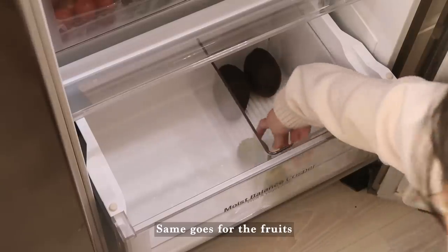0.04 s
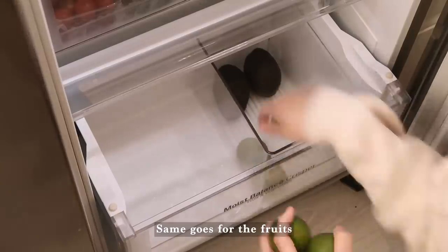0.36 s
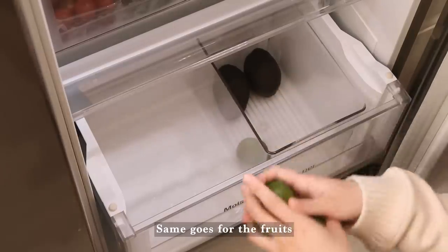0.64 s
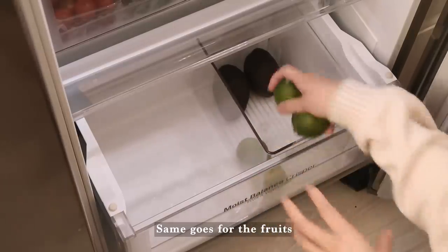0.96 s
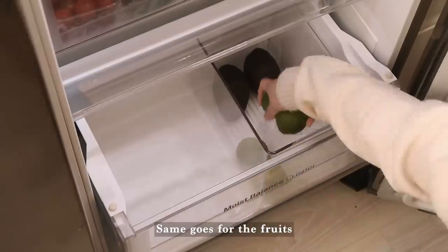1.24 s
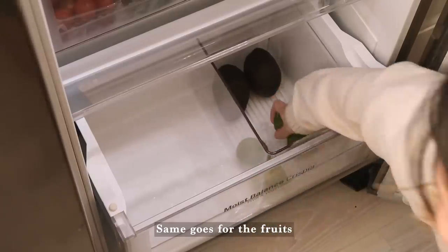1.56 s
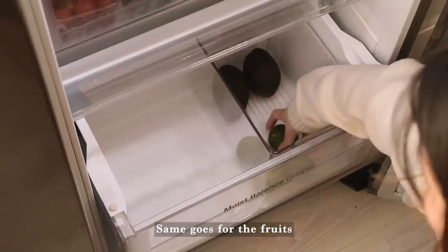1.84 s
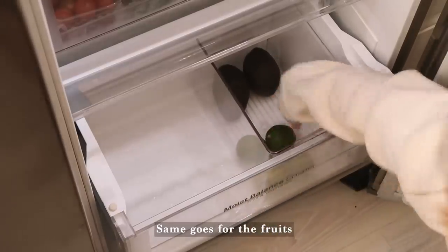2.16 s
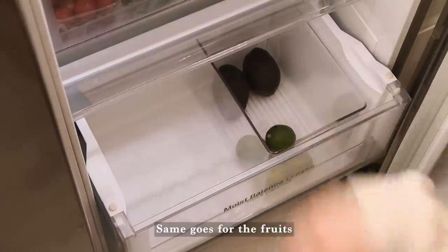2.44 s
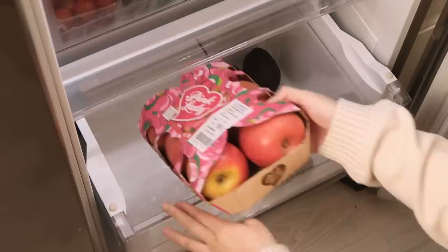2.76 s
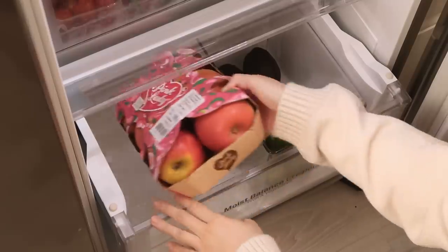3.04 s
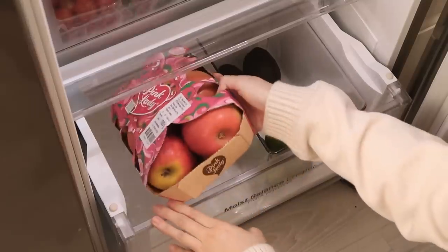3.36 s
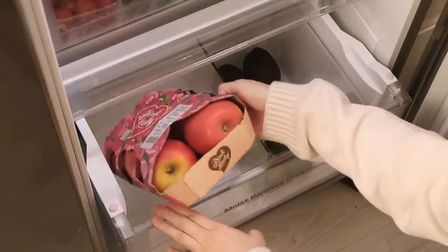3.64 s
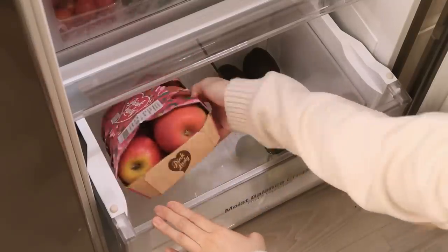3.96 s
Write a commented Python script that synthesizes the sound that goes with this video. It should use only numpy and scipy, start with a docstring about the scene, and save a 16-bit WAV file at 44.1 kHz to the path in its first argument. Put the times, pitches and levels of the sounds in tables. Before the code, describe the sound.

Dull thuds sound in a plastic fridge drawer as limes land and roll. A sleeve brushes past, then a carton of apples clatters in and scrapes lightly. The fridge hums low in a quiet kitchen.

```python
"""Limes, then a carton of apples, are set down in the plastic drawer of an open fridge.
Each blow rattles the thin walls, knocks the panel it lands on and makes the drawer's floor boom.
A sleeve brushes past; the carton scrapes along the plastic on its way in.
Behind, in a quiet kitchen: compressor hum, soft air and two spells of faint high ticks."""
import sys
import numpy as np
from scipy import signal
from scipy.fft import rfft, irfft
from scipy.io import wavfile
from scipy.ndimage import uniform_filter1d

SR = 44100
rng = np.random.default_rng(int(sys.argv[2]) if len(sys.argv) > 2 else 0)


def persist_wave(psi):
    """Save psi, clipped to +-1, as 16-bit WAV."""
    counts = np.round(np.clip(psi, -1, 1) * 32767).astype(np.int16)
    wavfile.write(sys.argv[1], SR, np.atleast_2d(counts).T)


N = 176400

# compressor and fan tones: freq_hz, rms_db
HUM_TONES = [(56.6, -40), (113.2, -53), (143.5, -61), (148, -64), (313, -59.5), (452.5, -67), (1825, -75),
             (13001, -90)]
# kitchen air: freq_hz, density_db
AIR_SPECTRUM = [(20, -8), (70, -1), (130, 0), (200, -3), (300, -3), (420, -6), (550, -9), (750, -13),
                (1100, -15.5), (2000, -16), (2600, -19), (4300, -23), (6000, -27.5), (9000, -33),
                (13500, -40), (15500, -54)]
# air width: freq_hz, side_to_mid_db
AIR_WIDTH = [(60, -46.5), (180, -8.5), (550, -2.5), (1650, -2.5), (4970, 0.5), (15000, 3)]
# spells of ticking: start_s, end_s
TICK_SPELLS = [(.1, 1.22), (3.66, 5.7)]
# room tail colour: freq_hz, gain_db
ROOM_SPECTRUM = [(60, -8), (150, -6.5), (300, -3), (600, -1.5), (3000, -4.5), (10000, -6)]
# room tail decay: freq_hz, t60_s
ROOM_DECAY = [(80, 0.92), (250, 0.37), (600, 0.29), (1500, 0.34), (4000, 0.29), (12000, 0.27)]
# foreground width: freq_hz, side_gain_db
SIDE_GAIN = [(100, -58), (300, -27.5), (1000, -21), (2200, -18.5), (4200, -8.5), (8000, 5.5)]
# sleeve as the arm reaches for the carton: time_s, level_db
SLEEVE_ENVELOPE = [(2.44, -68), (2.47, -54.5), (2.59, -52), (2.755, -54.5), (2.8, -67)]
# cloth friction: freq_hz, density_db
CLOTH_SPECTRUM = [(300, -16), (650, -1.5), (1200, -10), (2200, -5.5), (2700, -0.5), (3400, -8),
                  (6000, -18.5), (12000, -41)]
# carton slides: start_s, length_s, crest_db
CARTON_SLIDES = [(3.415, 0.19, -49.5), (3.759, 0.17, -46), (3.874, 0.16, -48.5)]
# cardboard friction: freq_hz, density_db
SCRAPE_SPECTRUM = [(100, -10), (400, -6.5), (800, -2.5), (1300, -5.5), (2400, -1.5), (4500, -10),
                   (7000, -25), (14000, -41)]
# drawer floor modes: freq_hz, level_db, t60_s
FLOOR_MODES = [(83.1, -17.5, 0.6), (104.5, 4, 0.19), (114.34, -2, 0.26), (132.8, -9.5, 0.29)]
# drawer wall modes: freq_hz, level_db, t60_s
WALL_MODES = [(262.6, -13, 0.46), (316.6, -2.5, 0.29), (392, -5.5, 0.26), (484.7, -7, 0.2),
              (607.7, -5.5, 0.16), (683, -14.5, 0.27), (781, -8, 0.16), (886, -10.5, 0.17),
              (1042, -10, 0.21), (1105, -5.5, 0.16), (1184, -4, 0.09), (1366, -12.5, 0.19),
              (1498, -12.5, 0.11), (2350, -16, 0.074)]
# the walls' crowd of small modes: freq_hz, density_db
RATTLE_SPECTRUM = [(60, -22.5), (190, -5.5), (350, -2), (650, 1.5), (1100, -4.5), (1500, -4), (2600, -2),
                   (3800, -6), (4900, -8.5), (6000, -16), (9500, -25), (15000, -44)]
# decay of those modes: freq_hz, t60_s
RATTLE_DECAY = [(150, 0.49), (500, 0.1), (1500, 0.092), (4000, 0.068), (12000, 0.17)]
# contact crack: freq_hz, density_db
CRACK_SPECTRUM = [(500, -2), (4800, -4), (7500, -13)]
# carton bumping rim, walls and floor: start_s, rattle_db, hardness_hz, boom_db, panel_hz, panel_db
CARTON_BLOWS = [(3.022, -39, 2500, -43, 774, -31), (3.030, -35, 2050, -57, 292, -25),
                (3.056, -33.5, 705, -20.5, 279, -25), (3.080, -40, 990, -41, 269.6, -19),
                (3.103, -29.5, 1650, -39, 268, -22.5), (3.169, -27, 3000, -39, 393, -27),
                (3.1743, -15.5, 4600, -26.5, 1115, -12.5), (3.181, -20.5, 2580, -33.5, 487, -12),
                (3.189, -28.5, 1600, -20.5, 306.6, -8.5), (3.587, -38.5, 1690, -39, 625, -54),
                (3.608, -62, 834, -30.5, 286, -29), (3.755, -35.5, 2120, -39, 298.6, -14),
                (3.783, -51, 1510, -52.5, 296, -24), (3.861, -30, 1680, -46, 987, -25.5),
                (3.866, -35, 2200, -23.5, 654, -17.5), (3.870, -37, 820, -35.5, 274, -18.5)]
# limes landing and rolling: start_s, rattle_db, hardness_hz, boom_db, panel_hz, panel_db
LIME_BLOWS = [(0.0, -27.5, 1447, -16, 265.7, -9), (.022, -40, 1200, -28, 309, -15),
              (.066, -42, 966, -46, 265.8, -19), (0.177, -45, 650, -34, 293, -26.5),
              (0.27, -56, 450, -43, 325, -35.5), (0.404, -64, 490, -65, 294, -34.5),
              (1.606, -37.5, 1110, -31, 299, -21.5), (1.619, -43.5, 400, -26, 255, -26.5),
              (1.762, -27, 1400, -42, 286, -9.5), (1.769, -22.5, 2530, -23.5, 419, -17.5),
              (1.775, -25.5, 2180, -22, 681, -13), (1.786, -25.5, 664, -13.5, 306, -15),
              (1.835, -36, 1000, -47, 318.4, -22.5), (1.900, -48, 500, -35, 269, -30),
              (2.215, -49.5, 450, -60, 296, -31.5), (2.283, -46.5, 750, -56, 295, -33)]


def amp(db):
    """Decibels to gain."""
    return 10 ** (np.asarray(db) / 20)


def unit(x):
    """Scale to rms 1."""
    return x / np.sqrt(np.mean(x ** 2) + 1e-20)


def lookup(table, hz):
    """Interpolate on a log-frequency axis."""
    freq_hz, value = np.transpose(table)
    return np.interp(np.log(hz + 1), np.log(freq_hz + 1), value)


def add(mix, start_s, sound):
    """Mix in at start_s."""
    part = mix[max(round(start_s * SR), 0):][:len(sound)]
    part += sound[:len(part)]


def colour(x, spectrum):
    """Filter by rows of freq_hz, gain_db."""
    return irfft(rfft(x) * amp(lookup(spectrum, np.fft.rfftfreq(len(x), 1 / SR))), len(x))


def noise(count, spectrum):
    """Coloured noise, rms 1."""
    return unit(colour(rng.standard_normal(count), spectrum))


def decay(x, t60_table):
    """Fade each band at its own rate."""
    hz, t, bands = signal.stft(x, SR, nperseg=256)
    bands = bands * amp(-60 * t / lookup(t60_table, hz)[:, None])
    return signal.istft(bands, SR, nperseg=256)[1][:len(x)]


def ring(modes, t, step_rad=0):
    """Damped sines, step_rad apart in phase."""
    return sum(amp(db - 60 * t / t60_s) * np.sin(2 * np.pi * hz * t + k * step_rad)
               for k, (hz, db, t60_s) in enumerate(modes))


def compressor_hum(waver_rad=0.05):
    """Compressor and fan tones; higher ones waver more in phase."""
    t = np.arange(N) / SR
    knots_s = np.linspace(0, N / SR, num=24)
    hum = np.zeros(N)
    for hz, db in HUM_TONES:
        drift = np.interp(t, knots_s, rng.standard_normal(len(knots_s)))
        drift_rad = waver_rad * np.sqrt(hz / HUM_TONES[0][0]) * drift
        hum += amp(db) * np.sqrt(2) * np.sin(2 * np.pi * hz * t + drift_rad)
    return hum


def air(mid_rms_db=-53):
    """Soft rush of air: mid, side."""
    mid, side = (amp(mid_rms_db) * noise(N, AIR_SPECTRUM) for _ in range(2))
    return mid, colour(side, AIR_WIDTH)


def ticks(pitch_hz=4830, length_s=0.005, peak_db=-53.5, rate_per_s=24):
    """Spells of faint, high, irregular ticks."""
    t, tick_t = np.arange(N) / SR, np.arange(0, length_s, 1 / SR)
    active = sum((t > start_s) & (t < end_s) for start_s, end_s in TICK_SPELLS)
    pulses = (rng.random(N) < rate_per_s / SR) * rng.uniform(0.49, 1, N) * active
    tick = np.hanning(len(tick_t)) * np.sin(2 * np.pi * pitch_hz * tick_t)
    return amp(peak_db) * signal.fftconvolve(pulses, tick)[:N]


def kitchen_reverb(x, rise_s=0.003):
    """Short diffuse tail, different for each place of contact."""
    t = np.arange(SR // 2) / SR
    tail = decay(colour(rng.standard_normal(len(t)), ROOM_SPECTRUM), ROOM_DECAY)
    tail *= 1 - np.exp(-(t / rise_s) ** 2)
    return signal.fftconvolve(x, tail / np.linalg.norm(tail))[:N]


def sleeve(slips_per_s=6600, clump_db=0.2):
    """Knitted cloth brushing past: dense, slightly clumped fibre slips."""
    t = np.arange(N) / SR
    slips = rng.standard_normal(N) * (rng.random(N) < slips_per_s / SR)
    clumps = unit(uniform_filter1d(rng.standard_normal(N), size=600))
    level_db = np.interp(t, *np.transpose(SLEEVE_ENVELOPE), left=-np.inf, right=-np.inf)
    return amp(level_db + clump_db * clumps) * unit(colour(slips, CLOTH_SPECTRUM))


def carton_slide(length_s, crest_db, crest_share=0.94, slips_per_s=3400):
    """Cardboard on plastic: dense tiny slips that swell and stop."""
    count = int(length_s * SR)
    slips = rng.standard_normal(count) * (rng.random(count) < slips_per_s / SR)
    swell = np.interp(np.linspace(0, 1, count), [0, crest_share, 1], [0, 1, 0])
    return amp(crest_db) * swell * unit(colour(slips, SCRAPE_SPECTRUM))


def floor_boom(t, rise_s=0.012):
    """Low modes of the drawer's floor, slow to build."""
    return ring(FLOOR_MODES, t) * (1 - np.exp(-(t / rise_s) ** 2))


def panel_knock(t, pitch_hz, level_db, rise_s=0.002, flat_share=0.022, settle_s=0.0077):
    """The struck panel starts flat and stiffens as the load settles."""
    bent_t = t - flat_share * settle_s * (1 - np.exp(-t / settle_s))
    t60_s = 0.1 * np.sqrt(WALL_MODES[1][0] / pitch_hz)  # higher panels die sooner
    return ring([(pitch_hz, level_db, t60_s)], bent_t) * (1 - np.exp(-t / rise_s))


def wall_rattle(t, hardness_hz, ring_db, crack_db=5.5, crack_s=0.0016, press_cycles=2.33):
    """Crack and wall modes; softer contacts are duller and take longer to press home."""
    crowd = decay(noise(len(t), RATTLE_SPECTRUM), RATTLE_DECAY)
    crack = amp(crack_db) * np.exp(-t / crack_s) * noise(len(t), CRACK_SPECTRUM)
    modes = amp(ring_db) * ring(WALL_MODES, t, step_rad=np.pi)
    press = 1 - np.exp(-t * hardness_hz / press_cycles)
    lowpass = signal.butter(2, hardness_hz, fs=SR)
    walls = signal.lfilter(*lowpass, press * (crack + crowd + modes))
    return walls / np.std(walls[:SR // 50])  # rms 1 over the first 20 ms


def blow(rattle_db, hardness_hz, boom_db, panel_hz, panel_db, ring_db):
    """One contact drives the walls, one panel and the floor."""
    t = np.arange(SR * 2 // 5) / SR
    walls = amp(rattle_db) * wall_rattle(t, hardness_hz, ring_db)
    return walls + panel_knock(t, panel_hz, panel_db) + amp(boom_db) * floor_boom(t)


def scene(room_db=-8.5):
    """The drawer in its kitchen: near mono in the bass, wider in the treble."""
    sounds = [(start_s, blow(*contact, ring_db=-14.5)) for start_s, *contact in LIME_BLOWS]
    sounds += [(start_s, blow(*contact, ring_db=-8)) for start_s, *contact in CARTON_BLOWS]
    sounds += [(start_s, carton_slide(*slide)) for start_s, *slide in CARTON_SLIDES]
    sounds.append((0.0012, sleeve()))
    direct, room = np.zeros((2, N))
    for start_s, sound in sounds:
        add(direct, start_s, sound)
        add(room, start_s, kitchen_reverb(sound))
    hum = compressor_hum()
    air_mid, air_side = air()
    mid = direct + amp(room_db) * room + hum + air_mid + ticks()
    spread = 0.76 * signal.hilbert(direct).imag + 0.5 * kitchen_reverb(direct)
    side = colour(spread, SIDE_GAIN) + air_side
    return np.array([mid + side, mid - side])


def record(dry, cutoff_hz=15600):
    """Steep low-pass."""
    lowpass = signal.firwin(511, cutoff_hz, window=("kaiser", 9), fs=SR)
    return signal.oaconvolve(dry, lowpass[None], "same")


dry = scene()
out = record(dry)
persist_wave(out)
```